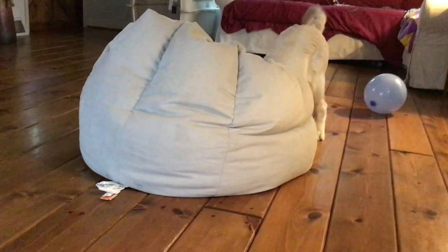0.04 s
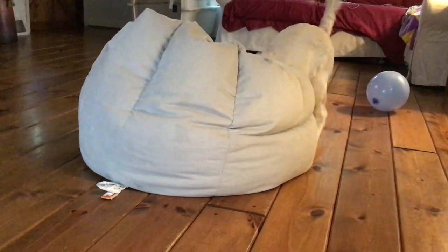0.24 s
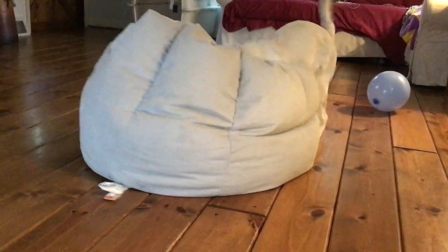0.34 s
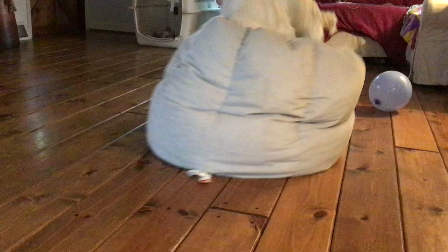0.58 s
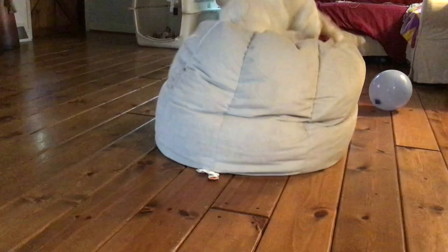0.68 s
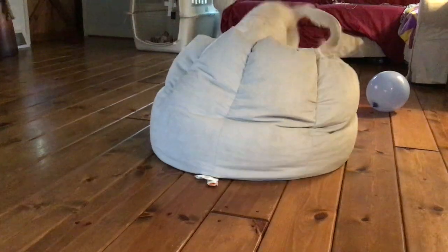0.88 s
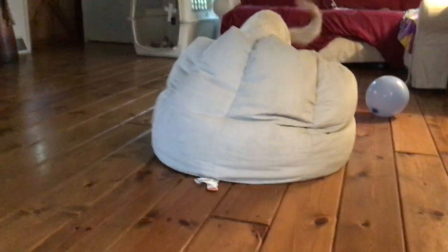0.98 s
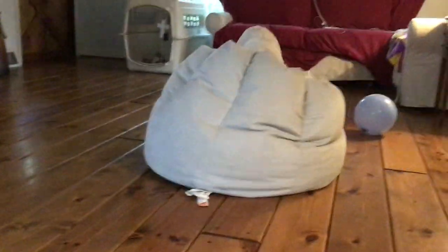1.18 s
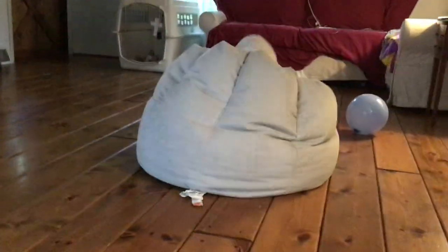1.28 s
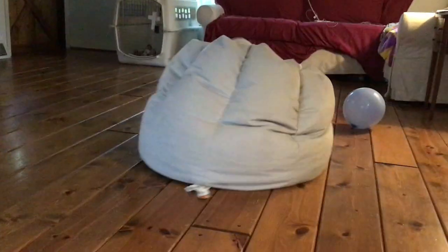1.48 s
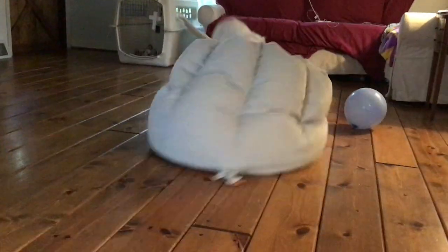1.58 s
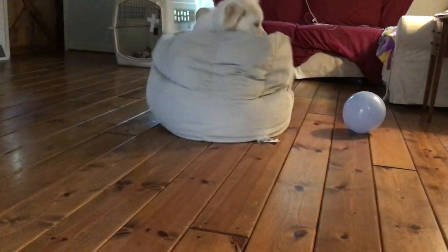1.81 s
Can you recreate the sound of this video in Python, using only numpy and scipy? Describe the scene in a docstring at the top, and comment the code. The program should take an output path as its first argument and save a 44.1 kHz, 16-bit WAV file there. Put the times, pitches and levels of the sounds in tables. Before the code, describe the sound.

A dog gives one gruff woof, then a bean bag scrapes and thuds over wooden floorboards.

```python
"""A dog growls into one gruff woof, then shoves a bean bag across a wooden living-room floor.
The voice is a gliding harmonic tone with rasp and chest rumble; it brightens as the jaw opens.
Cloth scrapes and hisses over the boards, paws knock, and the bag lands with soft, deep thuds
that ring the floor and rustle the filling. The room rings briefly over a faint background rumble."""
import sys
import numpy as np
from scipy import signal
from scipy.fft import rfft, irfft, next_fast_len
from scipy.io import wavfile
from scipy.ndimage import uniform_filter1d

SR = 44100
rng = np.random.default_rng(int(sys.argv[2]) if len(sys.argv) > 2 else 0)


def materialize(psi):
    """Save the field psi as 16-bit PCM at rate SR to the path in sys.argv[1].

    A 1-D psi becomes a single channel; in a 2-D psi each row is a channel.
    """
    bounded = np.clip(np.atleast_2d(psi).T, -1, 1)
    quanta = np.round(bounded * 32767).astype(np.int16)
    wavfile.write(sys.argv[1], SR, quanta)


N = 81585
T = np.arange(N) / SR

# voiced tone (time [s], pitch [Hz], level [dB])
VOICE_TRACK = [(0, 113, -63.5), (.08, 114.3, -63.5), (.12, 122.5, -48.5), (.147, 139.9, -44.5),
               (.168, 193.2, -44), (.19, 302.2, -40.5), (.206, 387.8, -19.5), (.213, 380, -16),
               (.233, 386, -10.5), (.254, 385.8, -10), (.262, 386.6, -25.5), (.297, 434.8, -23),
               (.311, 423, -39), (.36, 403, -57.5)]
# muzzle filter on the harmonics (frequency [Hz], gain [dB])
MUZZLE_GAIN = [(120, 2.5), (390, -3.5), (600, -1), (770, -23.5), (1170, -19), (1550, -23), (2000, -16.5),
               (2500, -34)]
# hoarse rasp (time [s], level [dB])
RASP_ENVELOPE = [(.158, -86.5), (.173, -42.5), (.203, -32.5), (.226, -22), (.255, -25), (.285, -28.5),
                 (.315, -34.5), (.37, -46.5)]
# throat and mouth colour of the rasp (frequency [Hz], relative density [dB])
RASP_SPECTRUM = [(100, -47), (200, -4.5), (330, -10.5), (450, 4.5), (560, 0), (690, -16), (900, -13),
                 (1020, -18.5), (1220, -10.5), (1680, -23.5), (2100, -22.5), (2650, -28), (2900, -40.5),
                 (3300, -36.5), (4100, -48), (4900, -49.5), (5400, -44.5), (6200, -60), (9000, -73.5),
                 (13000, -100)]
# chest rumble (time [s], level [dB])
CHEST_ENVELOPE = [(0, -60.5), (.09, -53.5), (.14, -49.5), (.18, -29), (.25, -41), (.28, -45), (.33, -46),
                  (.38, -72.5)]
# chest rumble (frequency [Hz], relative density [dB])
CHEST_SPECTRUM = [(50, -48), (100, -19.5), (160, -3), (245, 3), (330, -15.5), (550, -14), (850, -32),
                  (4000, -64.5)]
JITTER_RATIO, SHIMMER_DB, FLUTTER_HZ, RASP_PULSE_DEPTH = 0.014, 0.9, 258.7, 0.18
JAW_OPENS_S, JAW_TRAVEL_S, CLOSED_JAW_HZ, VOICE_END_S = 0.16, 0.03, 850, 0.41


def woof():
    """A low growl slides up into a near-pure bark; the opening jaw lets the treble out."""
    pitch_hz = curve(VOICE_TRACK) * (1 + JITTER_RATIO * wander(FLUTTER_HZ))
    phase = 2 * np.pi * np.cumsum(pitch_hz) / SR
    hz, db = np.array(MUZZLE_GAIN).T
    tone = sum(undb(np.interp(k * pitch_hz, hz, db)) * np.sin(k * phase) / k for k in range(1, 7))
    tone *= np.sqrt(2) * undb(curve(VOICE_TRACK, column=2) + SHIMMER_DB * wander(FLUTTER_HZ))
    pulsing = (1 + RASP_PULSE_DEPTH * np.cos(phase / 2)) ** 2  # at half the pitch
    rasp = colour(rng.standard_normal(N) * pulsing, RASP_SPECTRUM) * undb(curve(RASP_ENVELOPE))
    chest = noise(CHEST_SPECTRUM) * undb(curve(CHEST_ENVELOPE))
    voice = tone + rasp + chest
    muffled = signal.sosfiltfilt(signal.butter(2, CLOSED_JAW_HZ, fs=SR, output="sos"), voice)
    jaw = np.clip((T - JAW_OPENS_S) / JAW_TRAVEL_S, 0, 1) ** 2
    fade_out = np.clip((VOICE_END_S - T) / 0.035, 0, 1)
    return (muffled + jaw * (voice - muffled)) * fade_out


# weight of dog and bag coming down (time [s], level [dB], contact length [s])
LANDINGS = [(0.489, -48, 0.0053), (.54, -56, 0.0021), (0.777, -43, 0.0074), (.845, -48, 0.00094),
            (1.356, -38, 0.0066), (1.388, -37, 0.0088), (1.418, -49.5, 0.0043), (1.475, -39.5, 0.00485),
            (1.49, -25, 0.00588), (1.513, -27, 0.0067), (1.613, -39, 0.011), (1.69, -44.5, 0.0038)]
# floor resonances (frequency [Hz], gain [dB], t60 [s])
FLOOR_MODES = [(70.7, -27, 0.38), (84.3, -1, 0.24), (116, 3.5, 0.067), (158.2, 3, 0.3), (228.7, 4.5, 0.25),
               (285, -7, 0.23)]
# shifting filling (frequency [Hz], relative density [dB])
FILLING_SPECTRUM = [(40, -9), (100, 20.5), (250, 6), (500, -2), (1000, -17), (2200, -13.5), (3300, -21),
                    (4000, -42), (8000, -41), (14000, -65)]
FILLING_GAIN_DB, FILLING_DECAY_S = -4, 0.026


def thuds():
    """Soft pushes ring the floor and crunch the filling."""
    push, crunch = np.zeros(N), np.zeros(N)
    for start_s, db, contact_s in LANDINGS:
        contact = np.sin(np.pi * np.clip((T - start_s) / contact_s, 0, 1)) ** 2
        push += undb(db) * contact / contact.sum()
        crunch += undb(db) * burst(start_s, FILLING_DECAY_S)
    boards = sum(undb(db) * ring(push, hz, t60_s).imag for hz, db, t60_s in FLOOR_MODES)
    return boards + undb(FILLING_GAIN_DB) * crunch * noise(FILLING_SPECTRUM)


# sliding bag (time [s], scrape level [dB], hiss level [dB])
SLIDE_ENVELOPE = [(.3, -69.5, -81), (.4, -61, -68.5), (.48, -51, -58), (.6, -48.5, -54.5), (.68, -55, -60),
                  (.73, -53, -59), (.78, -50.5, -59.5), (.83, -46, -58.5), (.89, -46.5, -54.5),
                  (.96, -53.5, -61.5), (1.09, -53, -57.5), (1.15, -58.5, -61), (1.24, -55, -60.5),
                  (1.3, -56, -68.5), (1.41, -52, -66), (1.45, -55, -65), (1.52, -52.5, -66),
                  (1.6, -55.5, -60), (1.67, -49, -58.5), (1.715, -43, -52.5), (1.77, -47.5, -52),
                  (1.85, -52, -57.5)]
# cloth scrape (frequency [Hz], relative density [dB])
SCRAPE_SPECTRUM = [(40, -19.5), (75, 10.5), (130, 5), (260, 10.5), (400, 5), (620, 5), (1000, 1.5),
                   (1600, 0.5), (2400, 1.5), (3000, 3), (3800, -4), (5500, -9), (7500, -18), (15000, -36.5)]
# cloth hiss (frequency [Hz], relative density [dB])
HISS_SPECTRUM = [(500, -20.5), (2500, -5), (4000, -3), (6000, -4.5), (7700, -9.5), (8600, -4),
                 (10500, -7.5), (13000, -14.5), (15500, -20)]
GRIP_SPREAD_DB, GRIP_RATE_HZ, GRAIN_SPREAD_DB = 1.0, 45.22, 2.5


def bag_slide():
    """Cloth catches and slips on the boards with a grainy scrape and a fine hiss."""
    grains = rng.standard_normal(N) * undb(GRAIN_SPREAD_DB * rng.exponential(size=N))
    scrape = colour(grains, SCRAPE_SPECTRUM) * undb(curve(SLIDE_ENVELOPE))
    hiss = noise(HISS_SPECTRUM) * undb(curve(SLIDE_ENVELOPE, column=2))
    grip = undb(GRIP_SPREAD_DB * wander(GRIP_RATE_HZ))
    fade_in = np.clip(T / SLIDE_ENVELOPE[0][0], 0, 1) ** 2
    return (scrape + hiss) * grip * fade_in


# paw strikes (time [s], scuff [dB], scuff decay [s], scuff cutoff [Hz], knock [dB], clack [dB])
PAW_STRIKES = [(0.4848, -34, 0.0021, 2000, -43, -65), (0.521, -38.5, 0.0027, 800, -51, -60),
               (1.3213, -33, 0.0042, 1930, -26, -42), (1.4713, -28.5, 0.011, 2050, -26, -50)]
# scuff before its low-pass (frequency [Hz], relative density [dB])
SCUFF_SPECTRUM = [(50, -56), (130, -0.5), (240, 8), (400, -0.5), (550, -4.5), (800, -8), (1050, -15.5),
                  (1400, -15), (1750, -18.5), (5000, -23), (12000, -26)]
# loose board edge (frequency [Hz], gain [dB], t60 [s])
EDGE_MODES = [(815, -13, 0.084), (1192, 0, .08), (1263, -11.5, 0.25), (1480, -9, 0.22)]
BOARD_HZ, BOARD_DECAY_S = 262.3, 0.012


def paws():
    """Each paw scuffs a board, makes it knock and clacks its loose edge."""
    out = np.zeros(N)
    for start_s, scuff_db, decay_s, cutoff_hz, knock_db, clack_db in PAW_STRIKES:
        scuff = colour(rng.standard_normal(N) * burst(start_s, decay_s), SCUFF_SPECTRUM)
        scuff = signal.sosfilt(signal.butter(2, cutoff_hz, fs=SR, output="sos"), scuff)
        scuff /= np.sqrt(np.sum(scuff ** 2) / (decay_s * SR))
        age_s = T - start_s
        knock = np.sin(2 * np.pi * BOARD_HZ * age_s) * burst(start_s, BOARD_DECAY_S)
        clack = sum(undb(db) * np.sin(2 * np.pi * hz * age_s) * burst(start_s, t60_s / np.log(1000))
                    for hz, db, t60_s in EDGE_MODES)
        out += undb(scuff_db) * scuff + undb(knock_db) * knock + undb(clack_db) * clack
    return out


# room resonances (frequency [Hz], gain [dB], t60 [s])
STANDING_WAVES = [(372, -29.5, 0.71), (399.5, -11.5, 0.68), (417.3, -2, 0.87), (450, -9, .5),
                  (481, -6.5, 0.64), (535, -2, 0.36), (680.6, -2.5, 0.16)]
TAIL_DB, TAIL_DELAY_S, BASS_GAIN_DB, BASS_T60_S, TREBLE_T60_S = -9.5, 0.012, -14, 0.67, 0.51


def room(x):
    """A diffuse tail, shorter in the treble, and a few standing waves."""
    bass = noise([(100, -9.5), (300, -10), (900, -8.5), (2500, -9), (8000, -54)])
    treble = noise([(500, -40), (2000, -3.5), (5000, -4.5), (15000, -12.5)])
    age_s = np.maximum(T - TAIL_DELAY_S, 0)
    bass *= undb(BASS_GAIN_DB - 60 * age_s / BASS_T60_S)
    treble *= undb(-60 * age_s / TREBLE_T60_S)
    tail = (age_s > 0) * (bass + treble)
    diffuse = signal.fftconvolve(x, tail / np.sqrt(np.sum(tail ** 2)))[:N]
    standing = sum(undb(db) * ring(x, hz, t60_s).real * 2 * np.log(1000) / (t60_s * SR)
                   for hz, db, t60_s in STANDING_WAVES)
    return undb(TAIL_DB) * diffuse + standing


def room_air(level_db=-59.5):
    """Faint steady rumble with a trace of hiss."""
    air = noise([(40, 6.5), (80, -0.5), (220, -18), (600, -28), (1000, -31.5), (4000, -31), (15000, -54)])
    return undb(level_db) * air


def undb(db):
    """Decibels to gain."""
    return 10 ** (np.asarray(db) / 20)


def curve(table, column=1):
    """One table column, linearly interpolated in time."""
    rows = np.array(table)
    return np.interp(T, rows[:, 0], rows[:, column])


def colour(x, spectrum):
    """Minimum-phase filter from (frequency [Hz], gain [dB]) points; output at rms 1."""
    hz, db = np.array(spectrum).T
    size = next_fast_len(2 * N, real=True)
    bins_hz = np.maximum(np.fft.rfftfreq(size, 1 / SR), 1)
    gain = undb(np.interp(np.log(bins_hz), np.log(hz), db))
    cepstrum = irfft(np.log(gain), size)
    response = np.exp(2 * rfft(cepstrum[:size // 2], size))
    y = irfft(rfft(x, size) * response, size)[:N]
    return y / y.std()


def noise(spectrum):
    """Coloured noise at rms 1."""
    return colour(rng.standard_normal(N), spectrum)


def wander(rate_hz):
    """Smooth random drift with a spread near 1."""
    steps = np.interp(T * rate_hz, np.arange(2048), rng.standard_normal(2048))
    return 1.46 * uniform_filter1d(steps, int(SR / rate_hz / 2))


def burst(start_s, decay_s, rise_s=0.00045):
    """Sudden rise, exponential fall."""
    age_s = np.maximum(T - start_s, 0)
    return (1 - np.exp(-age_s / rise_s)) * np.exp(-age_s / decay_s)


def ring(x, hz, t60_s):
    """One decaying complex mode; a unit impulse rings with amplitude 1."""
    pole = np.exp((2j * np.pi * hz - np.log(1000) / t60_s) / SR)
    return signal.lfilter([1], [1, -pole], x + 1e-18)


def scene():
    """Dog, bag and floor in the room, mono."""
    direct = woof() + bag_slide() + paws() + thuds()
    return (direct + room(direct) + room_air())[None]


LOW_CUT_HZ, HIGH_CUT_HZ = 71, 15600


def record(dry):
    """Cuts the deepest bass and the highest treble."""
    y = signal.sosfilt(signal.butter(5, LOW_CUT_HZ, "high", fs=SR, output="sos"), dry)
    return signal.sosfilt(signal.ellip(10, .1, 80, HIGH_CUT_HZ, fs=SR, output="sos"), y)


dry = scene()
out = record(dry)
materialize(out)
```